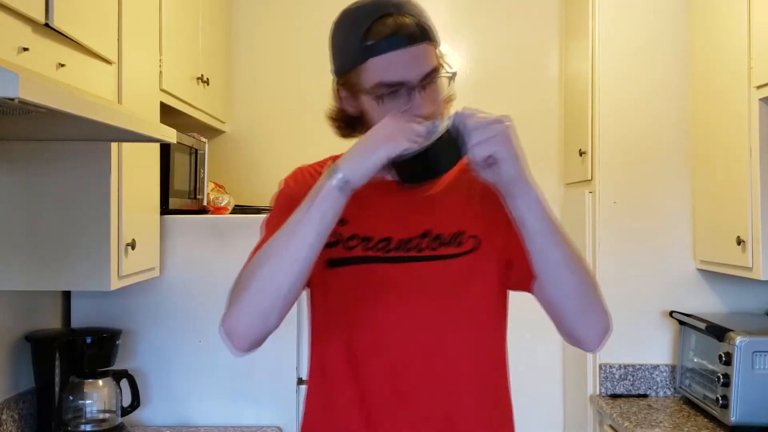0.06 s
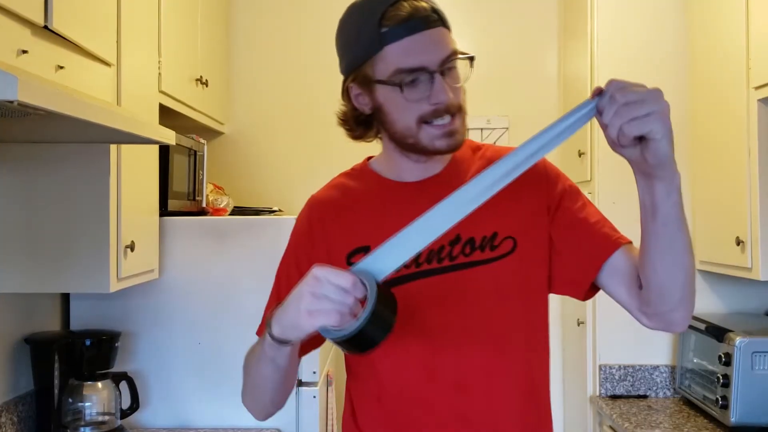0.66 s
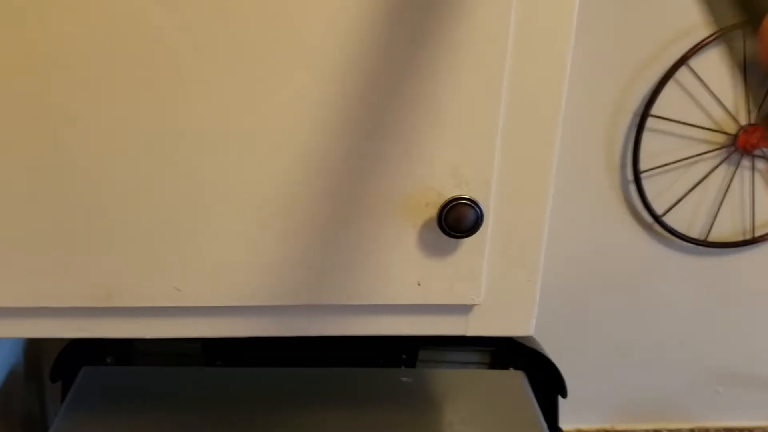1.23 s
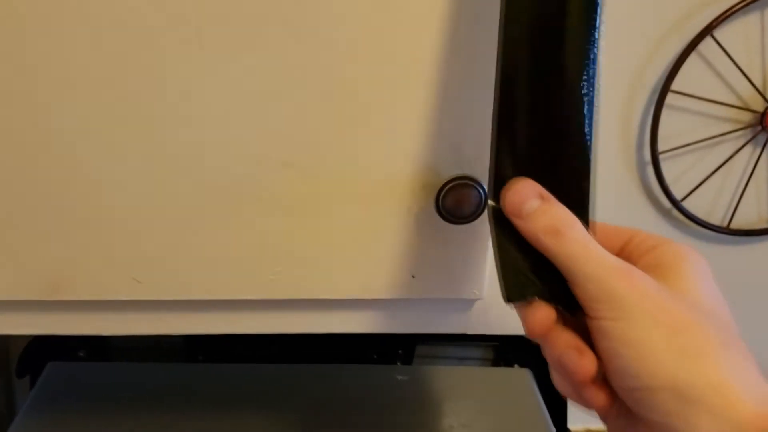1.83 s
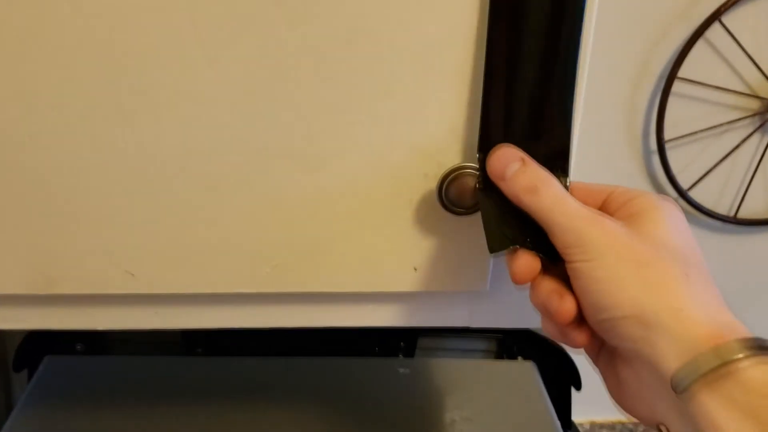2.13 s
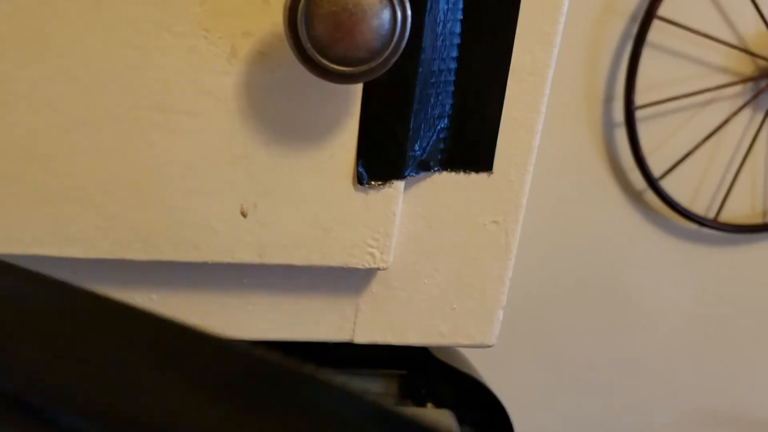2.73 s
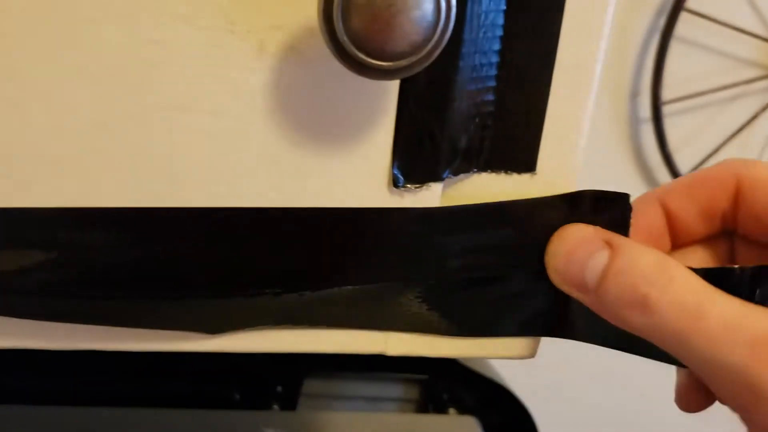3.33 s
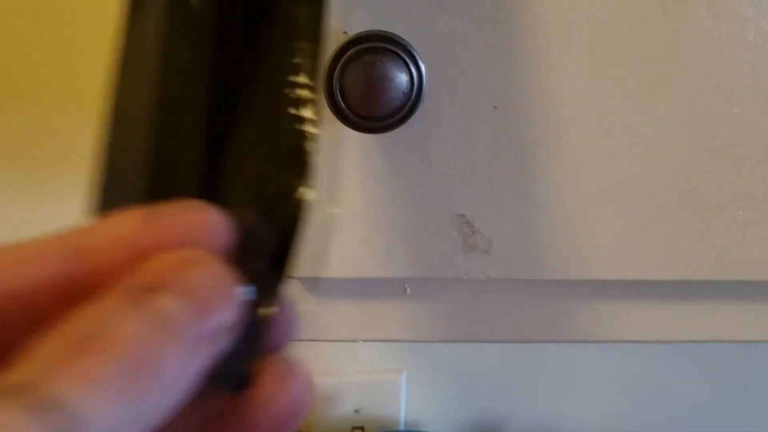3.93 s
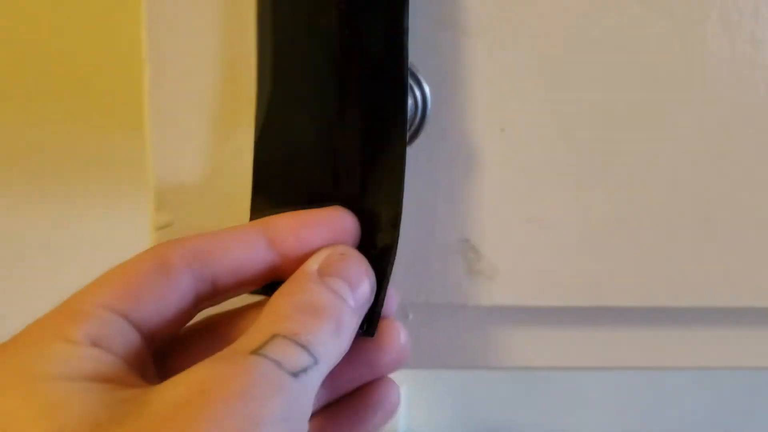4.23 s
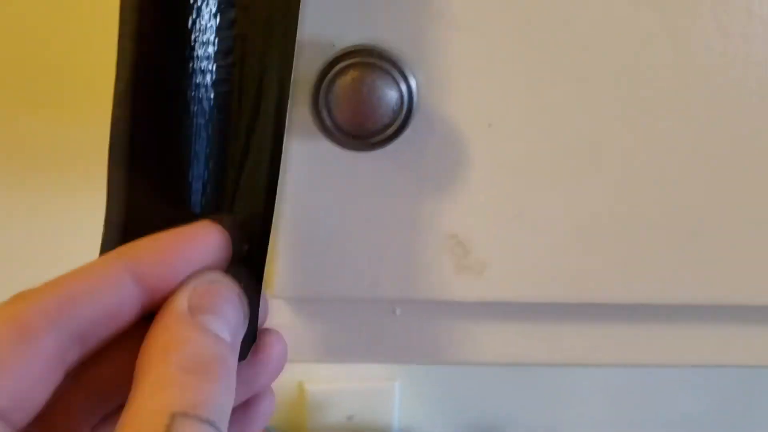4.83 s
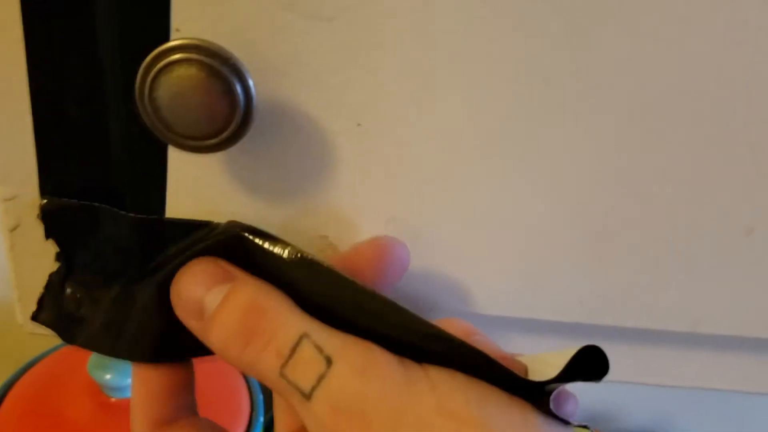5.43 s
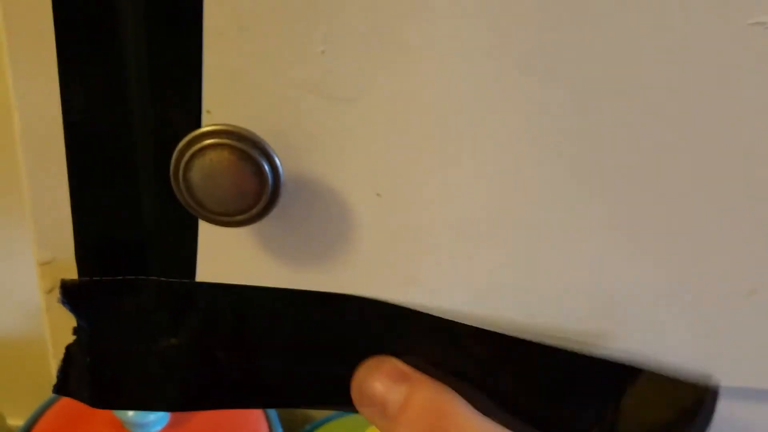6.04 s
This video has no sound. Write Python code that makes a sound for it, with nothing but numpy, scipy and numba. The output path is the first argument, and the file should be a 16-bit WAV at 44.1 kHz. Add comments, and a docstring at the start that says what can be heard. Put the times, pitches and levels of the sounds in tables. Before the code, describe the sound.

Fingers briefly crinkle duct tape, and at about 0.2 seconds a length rips loudly off the roll: a sharp snap and a fizzing rasp that dives in pitch and ends by 0.6 seconds, with a little small-kitchen echo. Faint room tone follows. At 1.2 seconds the sound cuts to a close microphone, and a low fridge hum with a thin hiss comes forward and stays, shifting in tone at about 2.5 and 3.7 seconds. A fingertip bumps a cabinet door with a click at 2.4 seconds, followed by faint tape ticks. At 3.6 seconds comes a sharp pop and a short peeling rasp, then light crinkling. More pops, rasps and soft bumps cluster around 4.6 to 4.8 seconds. Scattered clicks, crackles and light door knocks continue from 5 seconds, ending with a brief sticky peel around 6 seconds.

```python
"""A fridge hums in a small kitchen. Fingers crinkle duct tape, then rip a length off the roll: the glue
lets go in tiny snaps that ring the taut strip, and the pitch dives as the strip grows longer.
From 1.2 s the sound cuts hard through three close microphone positions as strips go onto cabinet doors.
Creases pop, fingertips bump the doors from 2.4 s on, and from 3.6 s the tape lifts in short rasps."""
import sys
import numpy as np
from scipy import signal
from scipy.fft import rfft, irfft, next_fast_len
from scipy.io import wavfile
from scipy.ndimage import uniform_filter1d
from numba import njit

SR = 44100
rng = np.random.default_rng(int(sys.argv[2]) if len(sys.argv) > 2 else 0)


def digitize_waveform(pressure):
    """Quantize a signal to 16-bit integers and store it at the path in sys.argv[1].

    Rows of a 2-D input are taken as channels; values are limited to [-1, 1].
    """
    field = np.atleast_2d(pressure).T
    bounded = np.clip(field, -1, 1)
    quanta = np.round(bounded * 32767).astype(np.int16)
    wavfile.write(sys.argv[1], SR, quanta)


N = 268128
T = np.arange(N) / SR

# fridge motor and fan: pitch_hz, level_db
FRIDGE_HUM = [(58.6, -51.5), (59.9, -62.5), (86.1, -57), (118.2, -55), (120, -53), (231.5, -64), (350, -66)]
# hiss in the fridge's pipes: pitch_hz, width_hz, level_db
PIPE_HISS = [(3093, 80, -1), (3297, 190, -1.5), (3540, 52, -0.5), (5100, 250, -4)]
# room tone at each microphone position: frequency_hz, level_db
AIR_FAR = [(15, -47.5), (25, -11), (87, 2), (130, -9.5), (175, -4), (384, -11.5), (796, -30), (1560, -33.5),
           (2550, -41.5), (3160, -36), (4250, -52), (16000, -54.5)]
AIR_DOOR = [(15, -44), (25, -18), (114, -1.5), (170, -13.5), (217, -4.5), (373, -10.5), (887, -19),
            (1230, -23.5), (2690, -26.5), (2910, -33.5), (3620, -44), (3920, -44), (5140, -54.5),
            (5730, -73), (16000, -46)]
AIR_CLOSE = [(15, -44), (25, -11.5), (92, -0.5), (166, -13), (335, -8), (560, -14.5), (1040, -21),
             (1440, -28.5), (2480, -32.5), (2910, -41), (3920, -51), (5140, -32), (7310, -35.5),
             (9570, -64.5), (16000, -50.5)]
AIR_CORNER = [(15, -55), (25, -24), (64, 2.5), (114, -6), (185, -13.5), (503, -17), (575, -20.5),
              (1400, -32.5), (1840, -32.5), (2280, -31.5), (3160, -43.5), (3920, -45.5), (5280, -39),
              (8140, -61), (16000, -43.5)]
# fingers working the tape: full_grip_s, hold_s, level_db, pan_db (left minus right)
GRIPS = [(0.0, 0.051, -58, -0.5), (0.1, .07, -51.5, 1), (1.37, 0.21, -77.5, -11.5), (2.6, 0.039, -60.5, -4),
         (2.86, 0.14, -78, -4), (3.153, 0.4, -75.5, -14), (3.588, 0.052, -48, 0.5),
         (3.755, 0.2, -55.5, 4.5), (4.591, 0.11, -49.5, 2), (4.73, 0.022, -42, 0), (5.042, 0.099, -54, 0),
         (5.44, 0.017, -55.5, -1), (5.63, 0.3, -58.5, 1), (5.883, 0.16, -46.5, 1)]
# tone of the crinkle: frequency_hz, level_db
CRINKLE_EQ = [(200, -9.5), (900, 1), (3500, -6.5), (6500, -5.5), (10000, 1.5), (15000, 3)]
# pulls that peel the glue:
# full_pull_s, attack_s, hold_s, release_s, level_db, first_pitch_hz, last_pitch_hz, damping, fizz_db
PULLS = [(0.102, 0.054, 0.011, 0.047, -69.5, 3740, 3750, 0.058, -12),
         (0.18, 0.0028, 0.0043, 0.059, -24, 3440, 3460, 1, 1),
         (0.184, 0.0028, .003, 0.041, -56, 990, 940, 0.59, -8),
         (0.224, .018, 0.21, .055, -21.5, 1500, 204.2, .8, 1),
         (0.496, 0.038, 0.017, 0.042, -42, 420, 400, 1, 10.5),
         (3.628, .06, 0.0028, .04, -31, 5900, 5600, 0.43, -19),
         (3.631, 0.0063, 0.01, 0.039, -34, 800, 414, 0.35, -13),
         (4.691, 0.011, 0.0039, 0.08, -36.5, 4800, 3530, .4, -8),
         (4.695, .006, 0.0062, 0.024, -39.5, 820, 696, 0.093, -12),
         (4.747, 0.007, 0.017, 0.042, -42.5, 780, 540, 0.28, 7),
         (5.964, 0.042, 0.011, 0.039, -41, 4500, 3730, 0.084, 5),
         (5.996, .03, 0.0032, 0.088, -36, 2720, 2320, 0.46, -24.5),
         (6.054, 0.032, 0.015, 0.074, -47, 3530, 3360, 0.17, -14)]
# tone of a snapping glue thread: frequency_hz, level_db
SNAP_EQ = [(60, -0.5), (300, 0), (700, -1), (1300, -3), (2400, -5), (3500, -1), (6500, -3.5), (10000, -5.5),
           (16000, -5)]
# resonances of the roll and the hand around it: pitch_hz, width_hz, level_db
ROLL_MODES = [(418, 270, -1), (592, 13, -5), (1017, 95, 1), (1590, 25, -6.5), (1745, 250, 1),
              (1960, 71, -4.5), (3080, 60, -6.5)]
# single pops of the creasing tape: start_s, level_db, pitch_hz, tick_db, pan_db
CREASE_POPS = [(0.180, -21, 4070, 18, 20), (0.219, -14.5, 4050, 13, -4), (1.384, -49.5, 4000, 4.5, -3),
               (2.441, -25, 2330, -9, 4), (2.448, -28.5, 2010, -6, 0.5), (2.655, -37, 5950, -11, 12),
               (2.862, -47.5, 6500, 4, 2), (2.904, -48, 6500, 5, 0), (2.965, -49, 6600, 7, 0),
               (3.033, -50, 6500, 6, -1), (3.589, -33, 6100, -16, 2), (3.626, -1.5, 6950, -5, -13),
               (3.683, -23, 6660, -7, 1), (3.989, -33, 4600, 3.5, -0.5), (4.581, -40, 3980, 18, 15),
               (4.586, -28, 3400, 15, -2), (4.680, -6, 4350, 2.5, 4.5), (4.7142, -14, 2900, 9.5, 7),
               (4.745, -7, 2220, 2, 1), (5.0861, -17.5, 3620, -11, -2), (5.134, -25, 4400, 1, -5.5),
               (5.382, -31, 2450, 4.5, -1), (5.447, -32, 4760, 4, 3), (5.573, -34, 3560, 5.5, 2),
               (5.698, -36, 3400, 7, 8), (5.813, -31, 2680, 12, 2), (5.872, -30, 2000, -8, 8),
               (5.9087, -18.5, 1910, 6.5, 4.5)]
# fingertips landing on the doors: start_s, level_db, contact_s
DOOR_BUMPS = [(2.439, -22.5, 0.0018), (3.632, -31.5, 0.00079), (4.585, -36, 0.0015), (4.746, -29.5, 0.0015),
              (5.040, -33.5, 0.0015), (5.056, -33.5, 0.0062), (5.086, -38, 0.0013), (5.377, -42.5, 0.002),
              (5.697, -43.5, 0.001), (5.909, -33, 0.0019)]
# modes of a cabinet door: pitch_hz, level_db, t60_s
DOOR_MODES = [(81.5, -13, 0.42), (200, -1.5, 0.053), (238, -4.5, 0.25), (298.4, 2, 0.1), (347, -0.5, 0.045),
              (492, -8.5, 0.11), (620, -6, 0.047), (797, 7.5, 0.084), (1047, 8, 0.058)]
# kitchen reverb: frequency_hz, t60_s
KITCHEN_DECAY = [(100, 0.34), (500, 0.43), (3000, 0.53), (7000, 0.41), (14000, 0.25)]
# tone of the microphone ports: frequency_hz, level_db
MIC_EQ = [(1000, 2), (2550, 0.5), (2780, 4.5), (2950, 3), (6800, 1), (7800, -1), (8800, -5.5),
          (10000, -3.5), (13000, -1.5), (16000, -0.5)]
# microphone positions: start_s, air_db, hum_db, hiss_db, whine_db, bass_pan_db, mid_pan_db, treble_pan_db
MIC_POSITIONS = [(0, -63.5, -18.5, -90.5, -93, 0.5, -0.11, -0.5),
                 (1.156, -50, -2, -69, -67.5, 1.5, 0.45, 11.5),
                 (2.452, -51, -6.5, -70, -69, -22.5, -0.67, 11),
                 (3.685, -47, 1.5, -65.5, -72.5, 1, 0.22, -2)]
PAN_BANDS_HZ = [130, 450, 2400]  # bass, mid, treble

GRIP_ATTACK_S, GRIP_RELEASE_S = 0.03, .17
CREASES_PER_S, CREASE_HZ, CREASE_WIDTH_HZ, CREASE_DB = 53, 6000, 3000, -15
SLIPS_PER_S, SLIP_EXPONENT = 800, .4  # rate at full pull; a softer pull slips more slowly
SAG_DB_PER_S, SWELL_DB_PER_S = 12, 12.5  # as the strip tightens, its body fades and the fizz grows


def undb(db):
    """Decibels to gain."""
    return 10 ** (np.asarray(db) / 20)


def unit(x):
    """Scale to rms 1."""
    return x / np.sqrt(np.mean(x ** 2))


def along(points, hz):
    """Read (Hz, value) points on a log-frequency axis."""
    f, value = np.transpose(points)
    return np.interp(np.log(hz + 0.0013), np.log(f), value)


def shape(x, gain):
    """Filter by a gain that is a function of frequency."""
    size = next_fast_len(x.shape[-1] + 4096)
    return irfft(rfft(x, size) * gain(np.arange(size // 2 + 1) * SR / size), size)[..., :x.shape[-1]]


def eq(x, points):
    """Filter by a (Hz, dB) curve."""
    return shape(x, lambda f: undb(along(points, f)))


def resonate(x, modes):
    """Ring (pitch_hz, width_hz, level_db) resonances."""
    return shape(x, lambda f: sum(undb(db) * 1j * f * width / (hz ** 2 - f ** 2 + 1j * f * width)
                                  for hz, width, db in modes))


def pan(db):
    """Constant-power gains, left louder than right by db."""
    gains = np.array([undb(db / 2), undb(-db / 2)]).reshape(2, -1)
    return gains / np.sqrt(np.mean(gains ** 2, axis=0))


def add(out, start, x):
    """Mix a short sound in at start seconds."""
    i = int(start * SR)
    out[..., i:i + x.shape[-1]] += x[..., :N - i]


@njit
def highpass(x, hz, damping):
    """Resonant high-pass with a sweepable corner."""
    y, band_state, low_state = np.empty(len(x)), 0., 0.
    for i in range(len(x)):
        g = np.tan(np.pi * hz[i] / SR)
        band = (band_state + g * (x[i] + 1e-18 - low_state)) / (1 + g * (g + damping))
        low = low_state + g * band
        y[i] = x[i] - damping * band - low
        band_state, low_state = 2 * band - band_state, 2 * low - low_state
    return y


def diffuse(size, alike_hz=900):
    """Noise from all around: nearly mono in the bass, wide in the treble."""
    mid, side = rng.standard_normal((2, size))
    width = lambda f: .04 + .46 * f ** 2 / (f ** 2 + alike_hz ** 2)
    mid = shape(mid, lambda f: np.sqrt(1 - width(f)))
    side = shape(side, lambda f: np.sqrt(width(f)))
    return np.array([mid + side, mid - side])


def wobble(size, smooth_samples):
    """Smoothed random modulation, rms 1."""
    return unit(uniform_filter1d(rng.standard_normal(size), size=smooth_samples))


def snaps(per_s, spread_db, size=N):
    """Random tiny clicks of uneven strength."""
    strength = undb(spread_db * np.minimum(rng.exponential(size=size), 4))
    return unit((rng.random(size) < per_s / SR) * strength * rng.choice([-1, 1], size))


def effort(t, attack, hold, release, ramp_db=30):
    """Envelope that swells until time 0, holds and dies away, by ramp_db per attack or release."""
    return undb(-ramp_db * (np.maximum(-t, 0) / attack + np.maximum(t - hold, 0) / release))


def before_cut(start, t):
    """Gate that closes at the first microphone cut after start."""
    return start + t < min([cut for cut, *_ in MIC_POSITIONS if cut > start] + [np.inf])


def fridge(waver=0.17, whine_hz=2854, whine_wobble_hz=32.2):
    """Three layers: wavering motor hum, a thin hiss in the pipes and a narrow whine."""
    hum = 0
    for hz, db in FRIDGE_HUM:
        drift = waver * np.interp(T, np.linspace(0, T[-1], num=30), rng.standard_normal(30))
        tone = np.sin(2 * np.pi * (hz * T + rng.random()) + drift)
        hum += np.sqrt(2) * undb(db) * (1 + drift) * tone
    hiss = unit(resonate(resonate(diffuse(N), PIPE_HISS), PIPE_HISS))
    pitch = whine_hz + whine_wobble_hz * wobble((2, N), 400)
    whine = np.sqrt(2) * np.sin(2 * np.pi * np.cumsum(pitch, axis=1) / SR)
    return hum, hiss, whine


def room_tones():
    """One bed of room air, coloured for each microphone position."""
    air = diffuse(N)
    return [unit(eq(air, curve)) for curve in (AIR_FAR, AIR_DOOR, AIR_CLOSE, AIR_CORNER)]


def crinkle(held_db=-82.5):
    """Sticky tape crackles under the fingers, and faint creases flip."""
    grip = sum(pan(pan_db) * undb(db) * effort(T - start, GRIP_ATTACK_S, hold, GRIP_RELEASE_S)
               for start, hold, db, pan_db in GRIPS)
    held = undb(held_db) * (T > MIC_POSITIONS[1][0])  # up close, even a held strip crackles
    crackle = np.array([unit(eq(snaps(per_s=1100, spread_db=3.3), CRINKLE_EQ)) for port in range(2)])
    creases = unit(resonate(snaps(CREASES_PER_S, spread_db=2.5), [(CREASE_HZ, CREASE_WIDTH_HZ, 0)]))
    return (crackle + undb(CREASE_DB) * creases) * (grip + held)


def peel(attack, hold, release, db, first_hz, last_hz, damping, fizz_db,
         slip_share=.38, jitter=.4, patchy_db=1.5, roll_db=-1, fizz_hz=13500, fizz_width_hz=4500):
    """Glue threads snap in bunches at each slip; the free strip rings lower as it grows longer."""
    size = SR // 2
    t = T[:size] - attack
    pull, held_s = effort(t, attack, hold, release), np.clip(t, 0, hold)
    slip_hz = SLIPS_PER_S * pull ** SLIP_EXPONENT * np.exp(jitter * wobble(size, 100))
    slip_phase = np.cumsum(slip_hz) / SR % 1
    tack = undb(patchy_db * wobble(size, 400))
    slips = tack * np.exp(-slip_phase / slip_share) / np.sqrt(slip_share / 2)
    threads = slips * unit(eq(snaps(per_s=9000, spread_db=2.3, size=size), SNAP_EQ))
    body = threads + undb(roll_db) * resonate(threads, ROLL_MODES)
    drawn = np.sin(np.pi / 2 * held_s / hold)  # the arm starts fast and slows to a stop
    pitch_hz = 1 / ((1 - drawn) / first_hz + drawn / last_hz)
    strip = highpass(body, pitch_hz, float(damping)) * undb(-SAG_DB_PER_S * held_s)
    sizzle = unit(resonate(snaps(per_s=8000, spread_db=1.6, size=size), [(fizz_hz, fizz_width_hz, 0)]))
    fizz = slips * sizzle * undb(fizz_db + SWELL_DB_PER_S * held_s)
    return (strip + fizz) * undb(db) * pull


def tape_pulls():
    """Every peel, from the long rip off the roll to the short lifts from a door."""
    out = np.zeros(N)
    for full_pull, attack, *settings in PULLS:
        rip = peel(attack, *settings)
        add(out, full_pull - attack, rip * before_cut(full_pull, T[:len(rip)] - attack))
    return out


def crease_pops(decay_cycles=1.1, tick_s=.0004):
    """A crease flips over: a sharp tick and a few cycles of the stiff backing."""
    out, t = np.zeros((2, N)), T[:600]
    for start, db, hz, tick_db, pan_db in CREASE_POPS:
        ring = np.sin(2 * np.pi * hz * t) * np.exp(-t * hz / decay_cycles)
        tick = np.diff(rng.standard_normal(len(t)), prepend=0) * np.exp(-t / tick_s)
        tick *= 1.5 * undb(tick_db) / np.linalg.norm(tick)
        add(out, start, pan(pan_db) * undb(db) * (ring + tick))
    return out


def door_bumps(spot_db=1.0, detune=.02):
    """A fingertip knocks a door; each spot favours other modes, and a softer contact sounds duller."""
    out, t = np.zeros(N), T[:12000]
    for start, db, contact_s in DOOR_BUMPS:
        door = 0
        for k, (hz, mode_db, t60) in enumerate(DOOR_MODES):
            spot, tuning = rng.standard_normal(2)
            decay = undb(mode_db + spot_db * spot - 60 * t / t60)
            door += (-1) ** k * decay * np.sin(2 * np.pi * hz * (1 + detune * tuning) * t)
        fingertip = np.hanning(int(contact_s * SR) + 3)
        knock = np.convolve(door, fingertip)[:len(t)]
        add(out, start, undb(db) * knock / np.abs(knock).max() * before_cut(start, t))
    return out


def kitchen(wet_db, lag_s, echo_s, echo_db, scatter_db, scatter_s=0.0022, build_s=0.00093):
    """Stereo response: direct sound, treble scattered by the hands, a slap off a door, then the room."""
    t = T[:30000]
    noise, tail = diffuse(len(t)), 0
    bands_hz, decays_s = np.transpose(KITCHEN_DECAY)
    for weights, t60 in zip(np.eye(len(bands_hz)), decays_s):
        band = shape(noise, lambda f: along(np.c_[bands_hz, weights], f))
        tail += band * undb(-60 * t / t60)
    tail *= 1 - np.exp(-(t / build_s) ** 2)
    treble = highpass(rng.standard_normal(2 * len(t)), hz=np.full(2 * len(t), 1500.), damping=0.47)
    scatter = treble.reshape(2, -1) * np.exp(-t / scatter_s)
    response = (undb(wet_db) * unit(tail) + undb(scatter_db) * unit(scatter)) / np.sqrt(len(t))
    for port, delay in enumerate([0, lag_s]):
        response[port, int(delay * SR)] += 1
        response[port, int((2 * delay + echo_s) * SR)] += undb(echo_db)
    return response


def scene():
    """Each microphone position hears its own stretch of the work, with its own room tone and balance."""
    foley = eq(tape_pulls() + crinkle() + crease_pops() + door_bumps(), MIC_EQ)
    far = kitchen(wet_db=-0.5, lag_s=.00003, echo_s=.0047, echo_db=-8.5, scatter_db=-3.5) * undb(-1.5)
    near = kitchen(wet_db=-7, lag_s=.0002, echo_s=.0018, echo_db=-7, scatter_db=-1.5) * undb(-0.5)
    ends = [cut for cut, *_ in MIC_POSITIONS[1:]] + [np.inf]
    hum, hiss, whine = fridge()
    out = 0
    for position, end, air, room in zip(MIC_POSITIONS, ends, room_tones(), [far, near, near, near]):
        start, air_db, hum_db, hiss_db, whine_db, *pans_db = position
        gate = uniform_filter1d(((T >= start) & (T < end)) * 1., size=64)
        action = signal.fftconvolve(foley * gate, room, axes=1)[:, :N]
        bed = undb(air_db) * air + undb(hum_db) * hum + undb(hiss_db) * hiss + undb(whine_db) * whine
        balance = list(zip(PAN_BANDS_HZ, pans_db))
        out += gate * shape(action + bed, lambda f: pan(along(balance, f)))
    return out


def record(dry, top_hz=15750):
    """A steep low-pass shaves off the top end."""
    return signal.sosfilt(signal.ellip(10, .2, 70, top_hz, fs=SR, output="sos"), dry)


dry = scene()
out = record(dry)
digitize_waveform(out)
```